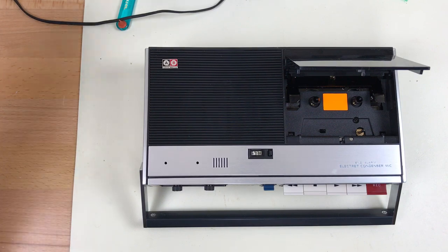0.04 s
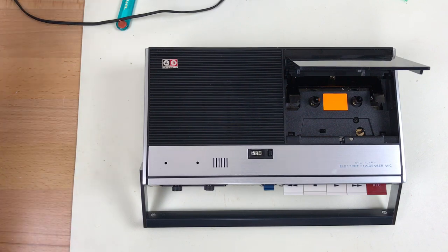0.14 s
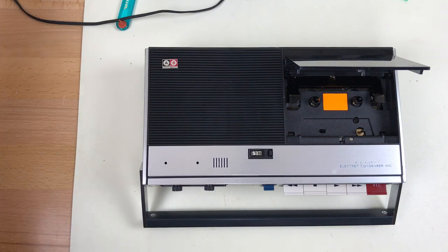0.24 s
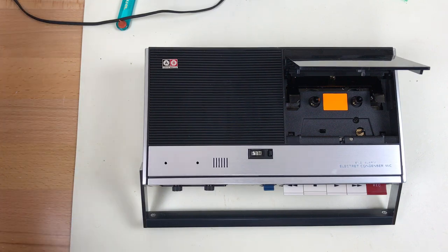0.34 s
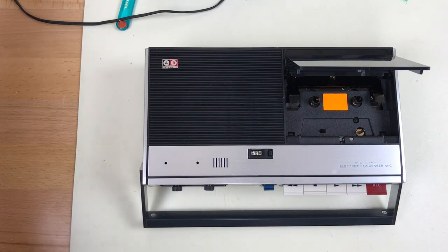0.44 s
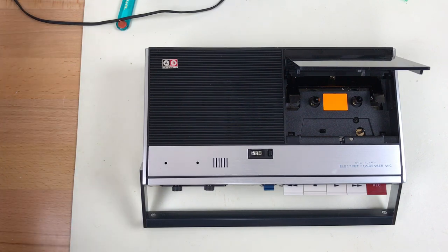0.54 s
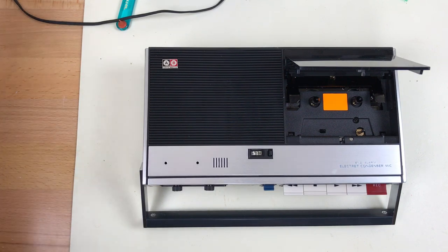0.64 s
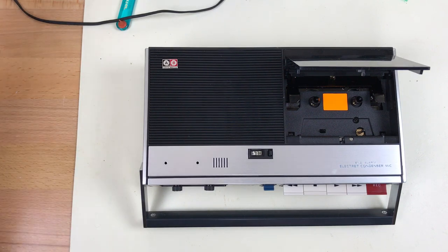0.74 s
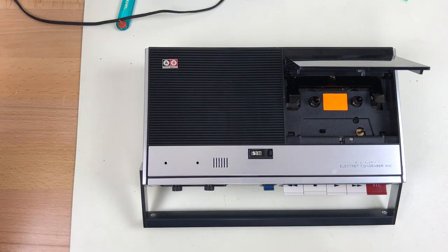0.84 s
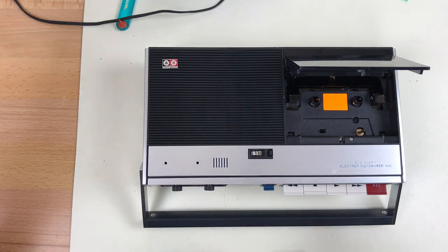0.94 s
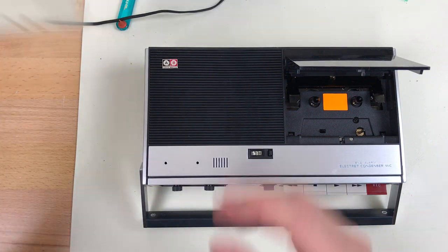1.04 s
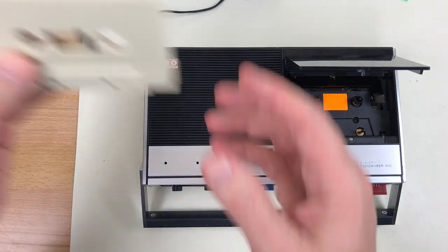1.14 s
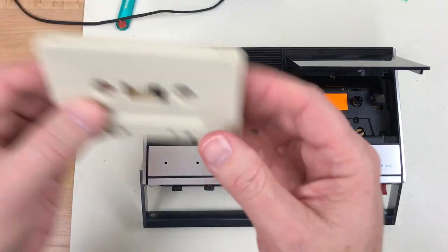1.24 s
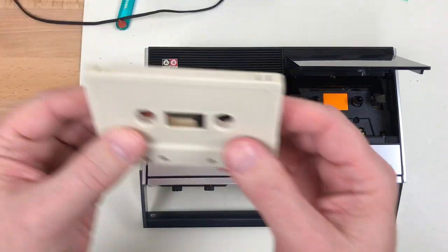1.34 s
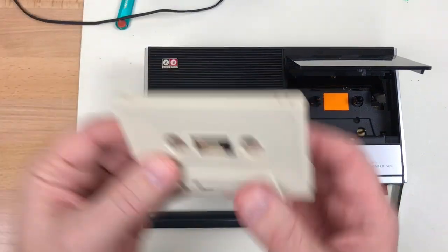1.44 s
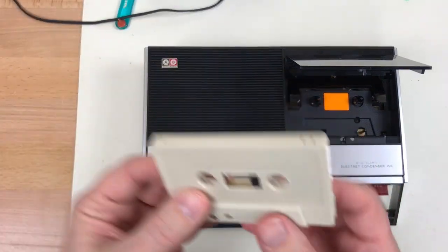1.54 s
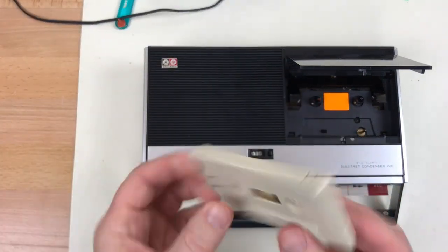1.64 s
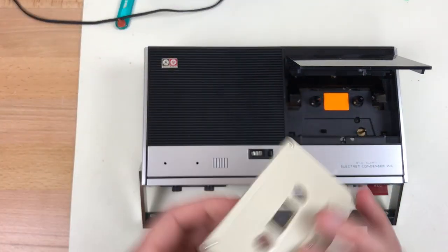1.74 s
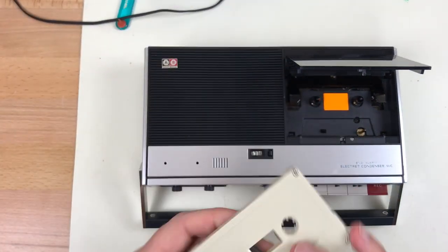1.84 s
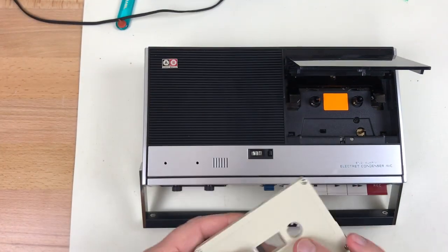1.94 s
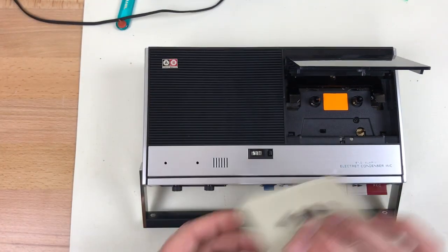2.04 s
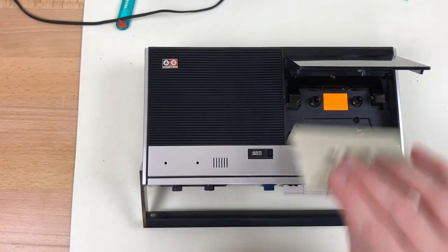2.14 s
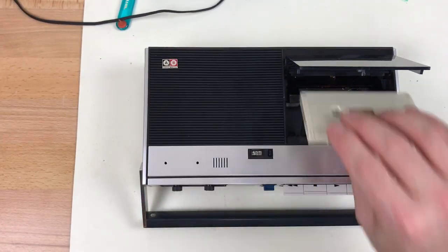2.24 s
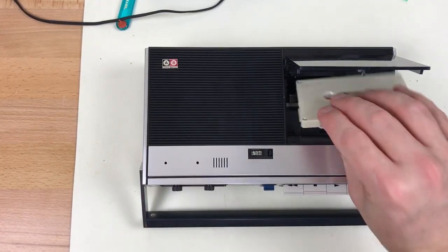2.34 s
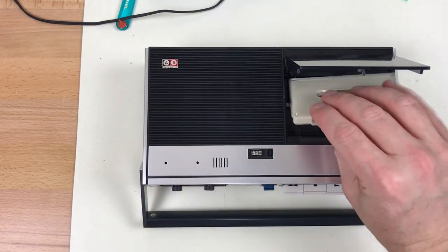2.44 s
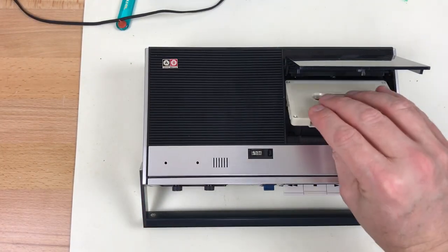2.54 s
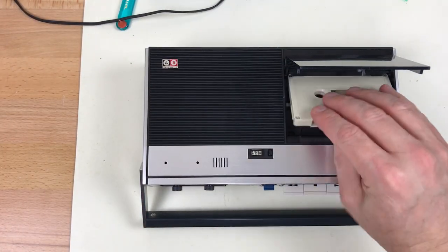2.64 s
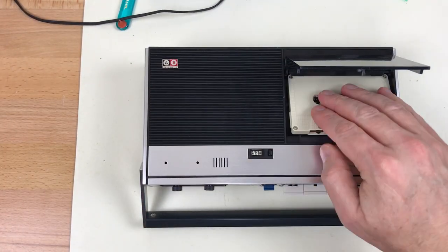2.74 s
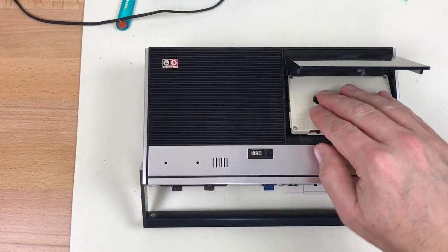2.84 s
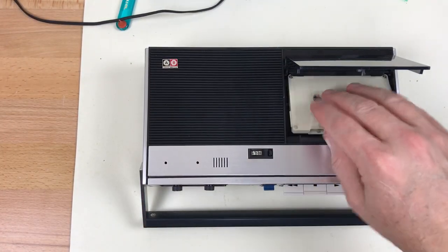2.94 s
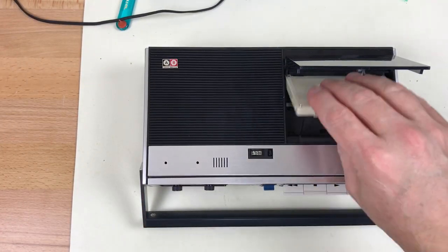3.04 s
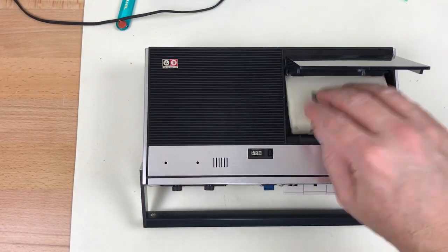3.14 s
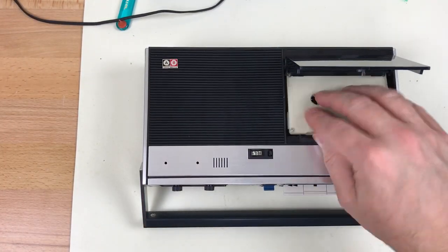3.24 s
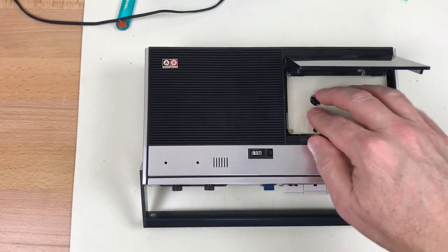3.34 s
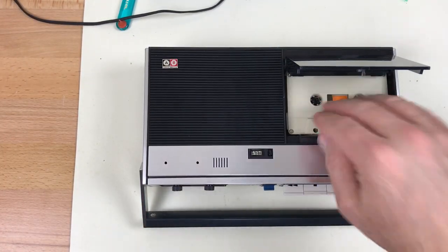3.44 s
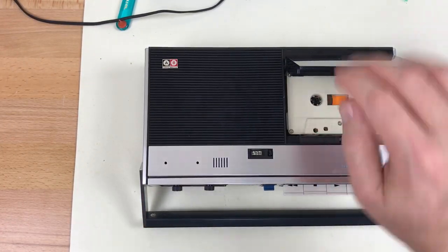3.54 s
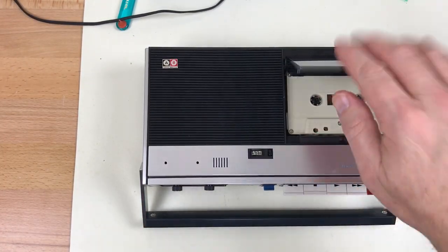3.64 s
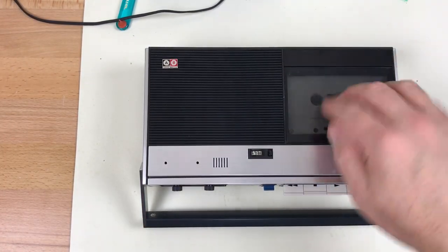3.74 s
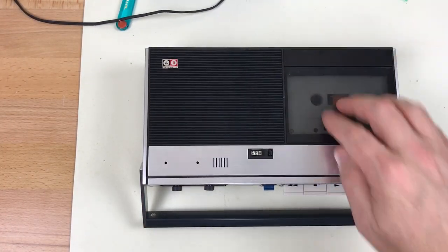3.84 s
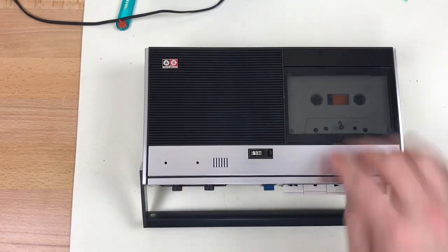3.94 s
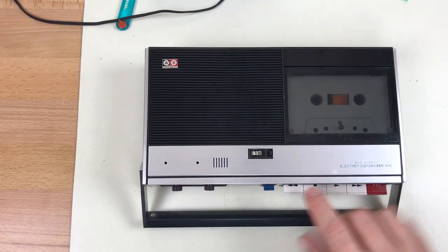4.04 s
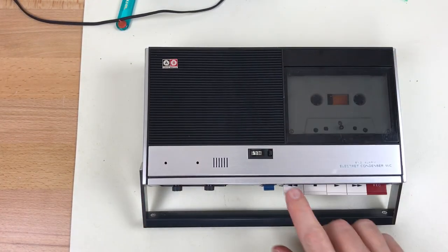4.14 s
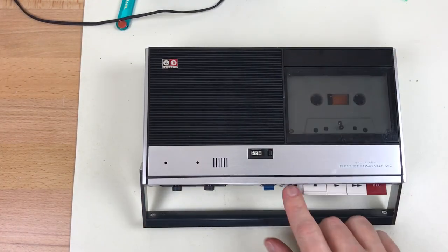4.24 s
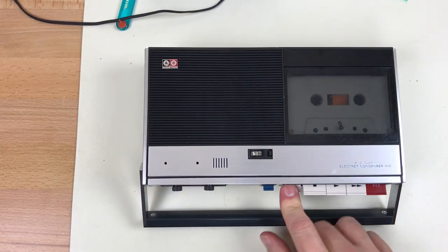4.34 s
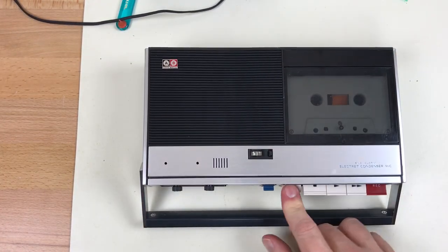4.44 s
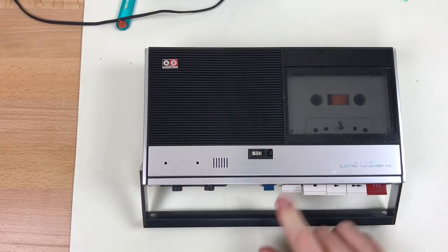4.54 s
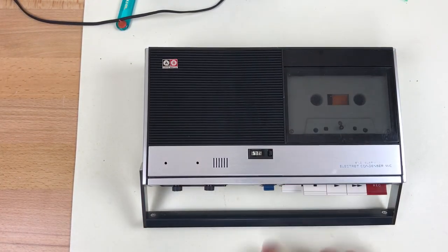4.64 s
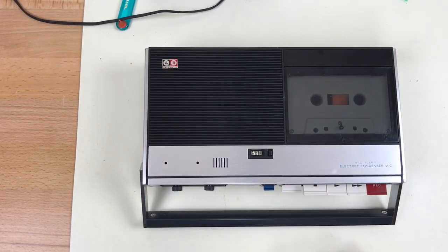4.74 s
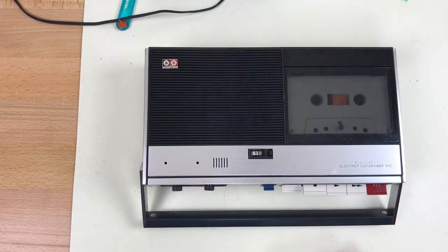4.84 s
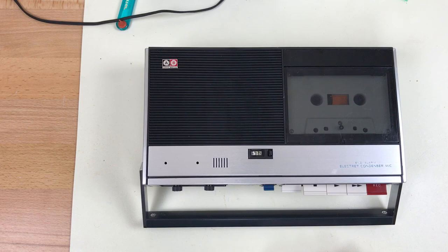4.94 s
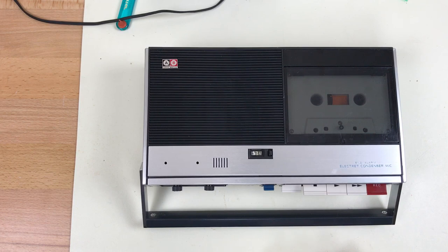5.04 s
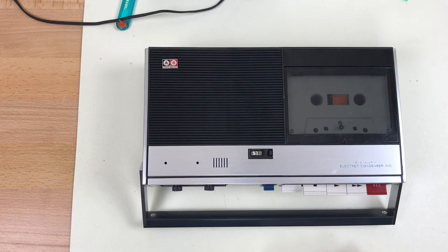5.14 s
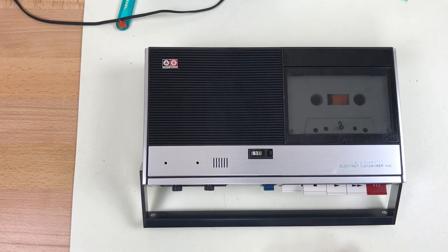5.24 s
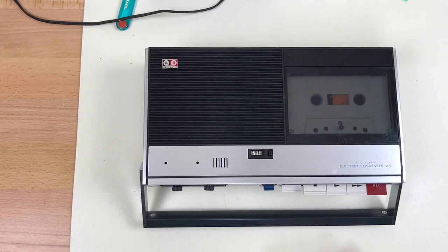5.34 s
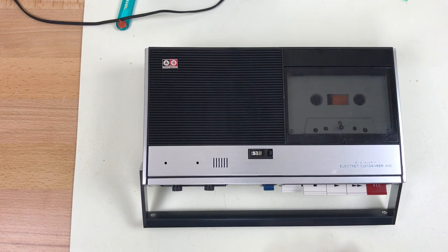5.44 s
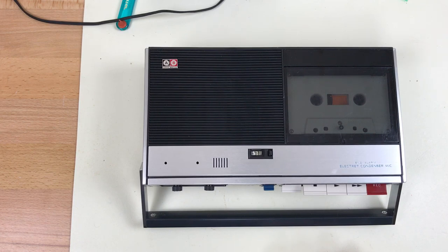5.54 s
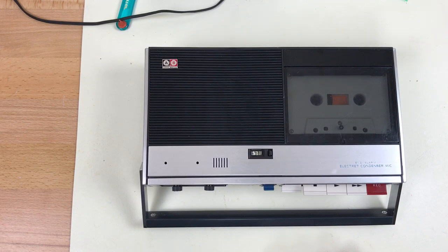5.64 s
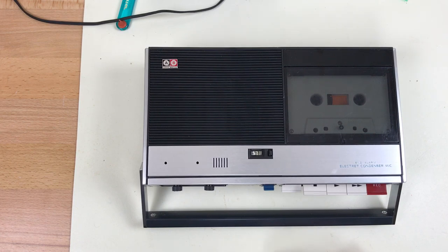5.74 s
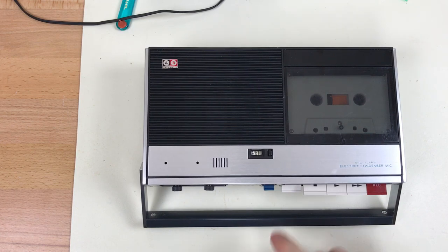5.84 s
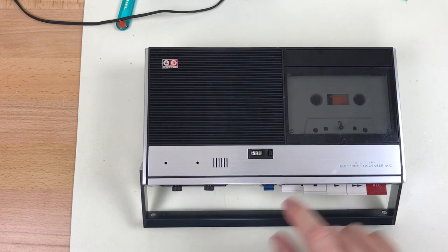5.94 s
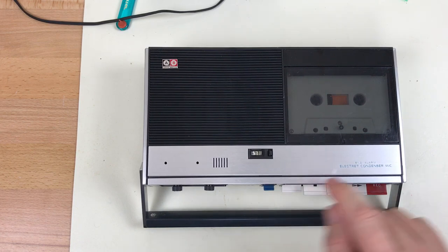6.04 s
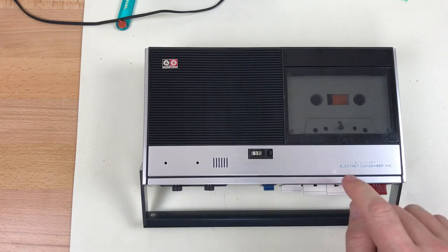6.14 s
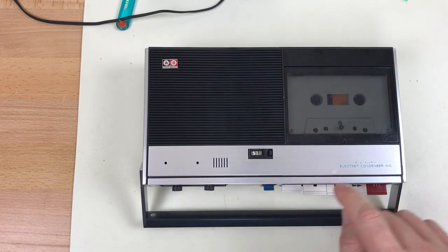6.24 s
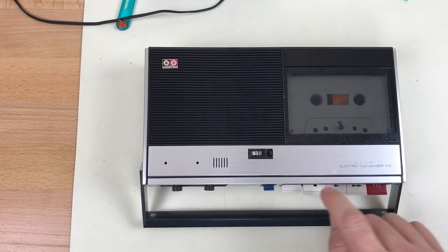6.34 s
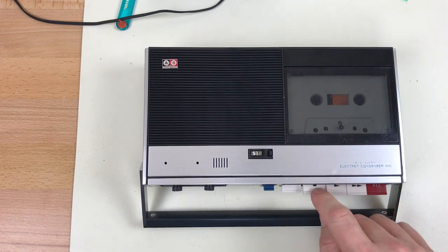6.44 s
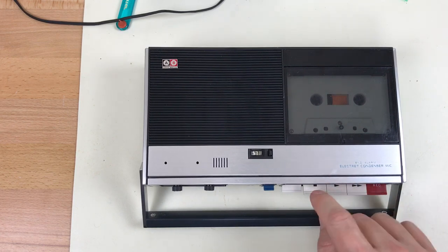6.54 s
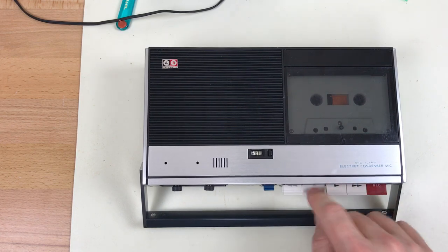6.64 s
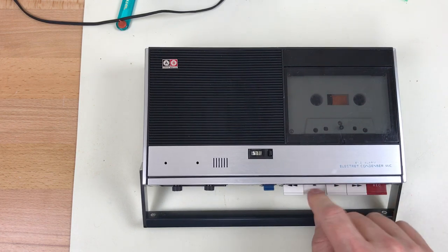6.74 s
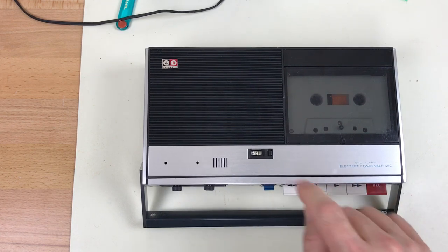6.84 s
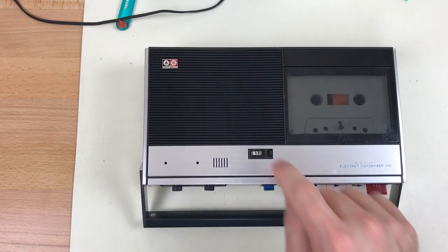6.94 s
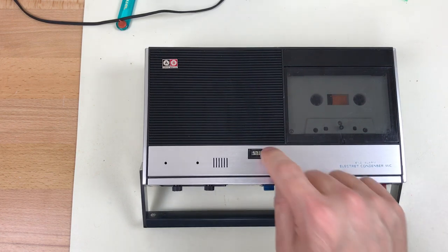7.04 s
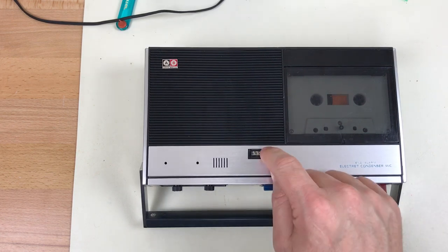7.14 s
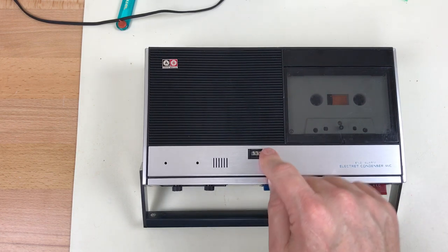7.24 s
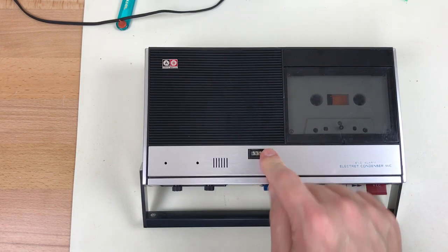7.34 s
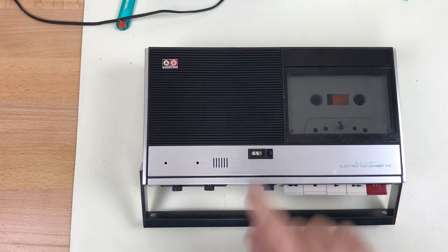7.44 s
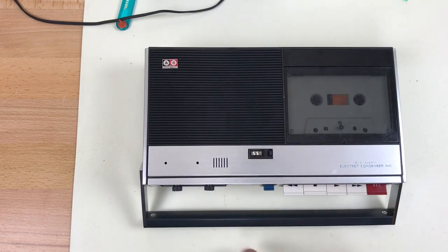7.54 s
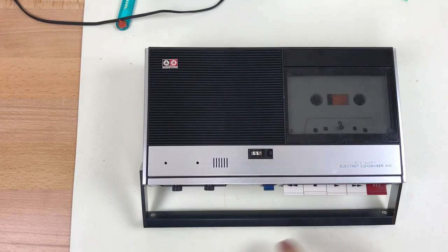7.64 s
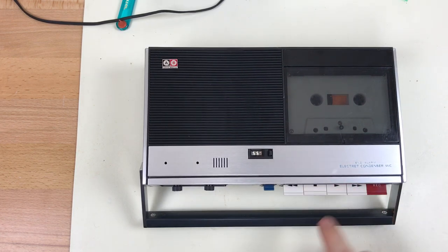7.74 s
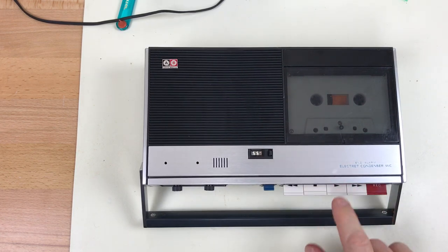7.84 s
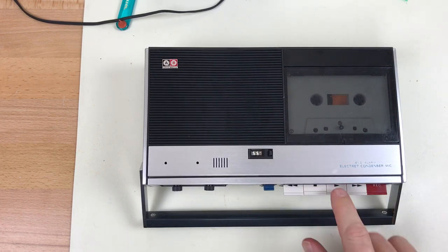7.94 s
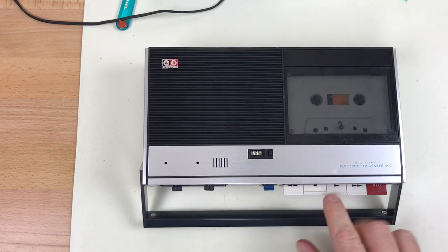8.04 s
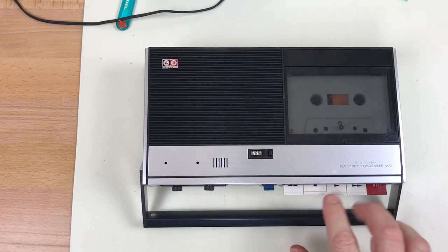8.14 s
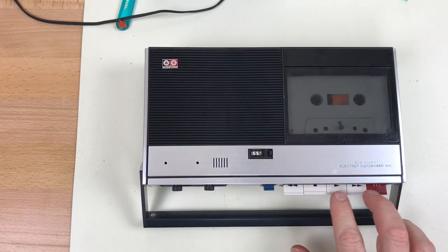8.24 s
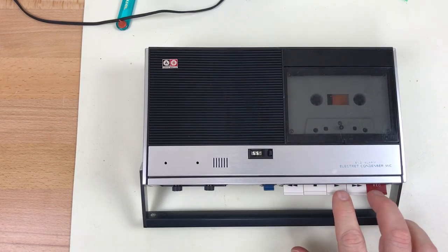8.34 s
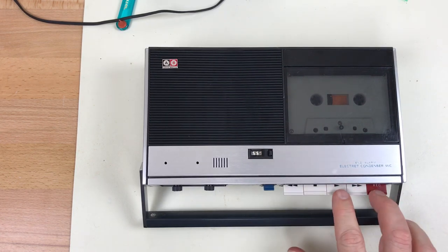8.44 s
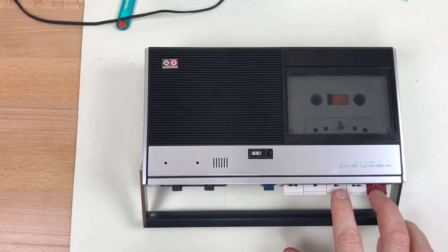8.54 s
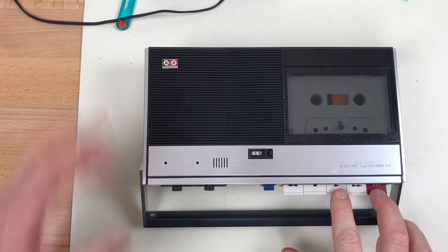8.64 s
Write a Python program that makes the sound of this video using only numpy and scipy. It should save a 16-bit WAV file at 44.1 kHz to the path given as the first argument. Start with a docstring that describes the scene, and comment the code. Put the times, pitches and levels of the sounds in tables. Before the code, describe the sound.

A plastic cassette box knocks open, a cassette rattles and clunks into a tape deck, the lid snaps shut, and keys clack in a quiet room.

```python
"""A desk in a quiet room, heard close: a portable tape deck stands on it and a cassette box opens off to the side.
The cassette rattles in the hands, slides and knocks into the well, the lid shuts, keys clack, the tape winds a second.
Knocks are chattering noise bursts through resonances of hollow case, thin shells and small parts, with room tails.
Slides and whirring spools are uneven noise through resonances; desk booms, springs and pings are decaying tones.
Beneath lie steady hiss, lumpy low rumble and two faint electronic tones."""
import sys
import numpy as np
from scipy import signal
from scipy.fft import rfft, irfft, next_fast_len
from scipy.io import wavfile
from scipy.ndimage import map_coordinates

SR = 44100
rng = np.random.default_rng(int(sys.argv[2]) if len(sys.argv) > 2 else 0)


def pcm_store(signal):
    """Save signal as 16-bit PCM."""
    levels = np.round(np.clip(np.atleast_2d(signal), -1, 1) * 32767)
    wavfile.write(sys.argv[1], SR, levels.astype(np.int16).T)


N = 382788

# background hiss and distant low unrest, colour only: (frequency [Hz], relative density [dB])
HISS_COLOUR = [(12, -28.5), (20, -0.5), (53, 1), (182, -8), (234, -6), (310, -7.5), (825, -13.5),
               (949, -15), (5380, -20), (6180, -19.5), (10800, -21.5), (12100, -20.5), (16000, -25.5)]
RUMBLE_COLOUR = [(20, 0), (60, -5.5), (120, -11), (300, -22.5), (500, -53.5)]
HISS_DB, HISS_TOP_HZ = -67.5, 15800
# faint electronic tones: (frequency [Hz], mean peak level [dB])
TONES = [(6010, -89.5), (12023, -86)]

# how fast the room dies away: (frequency [Hz], t60 [s])
ROOM_DECAY = [(150, 0.33), (600, 0.29), (2000, 0.26), (6000, 0.26), (15000, 0.22)]
# soft furnishings colour the room tail and swallow treble: (frequency [Hz], level [dB])
FURNISHINGS = [(300, -2.5), (2000, 2), (6000, -1), (10000, -1.5), (15000, -4)]
ECHOES = 16  # different room tails, taken in turn

# resonances of the hollow case, thin shells, small parts with edges, and running spools:
# (frequency [Hz], width [Hz], relative level [dB])
CASE_MODES = [(309, 66, -10.5), (366, 100, -11.5), (549, 150, -0.5), (649.5, 83, 0), (709, 62, 1),
              (844, 120, -2.5), (924, 99, -1.5)]
SHELL_MODES = [(1127, 130, -6.5), (1410, 82, 1.5), (1509, 260, 0), (1627, 150, 0.5), (1818, 160, -5.5),
               (2004, 380, -4.5), (2697, 490, -6.5), (2940, 1600, -9.5)]
SNAP_MODES = [(3573, 810, -1), (4423, 390, -2), (5225, 480, -0.5), (5900, 700, 0), (7740, 1700, 0),
              (9450, 3000, -4.5), (12900, 920, -5), (15200, 2000, -8.5)]
SPOOL_MODES = [(611.6, 63, 0.5), (899, 410, -9), (1450, 220, -6), (2100, 690, -16), (4520, 250, -10.5),
               (5640, 820, -15.5), (6950, 610, -16.5)]
# mode levels scatter from blow to blow; the room hears the modes this many times wider
SCATTER_DB, ROOM_BLUR = 3.5, 1.8

# spools running: (time [s], level [dB])
WINDING_LEVEL = [(4.42, -59), (4.5, -72.5), (4.737, -67.5), (4.928, -69), (5.38, -70), (5.46, -64)]

# a tiny loose metal part in the cassette: (frequency [Hz], t60 [s])
METAL_PART = (12070, .16)
# when it rings: (time [s], level [dB])
METAL_RINGS = [(1.8507, -47), (2.5258, -54), (2.69, -58), (3.22, -53), (3.3424, -56.5)]
# a thin ring, as of a steel spring: (frequency [Hz], relative level [dB], t60 [s])
SPRING_TONES = [(555, -26.5, 1.4), (690, 7.5, 0.18)]
# keys that set the spring off: (time [s], level [dB])
SPRING_PLUCKS = [(6.47, -57), (6.567, -61.5), (6.72, -36.5), (6.83, -53), (7.135, -61)]

# plastic sliding on plastic:
# (start [s], end [s], shell level [dB], case re shell [dB], snap re shell [dB])
SLIDE_MOVES = [(.348, .43, -45.5, -9, -22), (.435, .6, -59, 2, -16), (.72, .8, -68, -9, -27),
               (.98, 1.05, -69, 0, -14), (1.47, 1.56, -70, -4, 0), (1.72, 1.79, -70, -11, -9),
               (1.83, 1.93, -59, -10, -9), (1.998, 2.1, -65, -20, -4), (2.378, 2.43, -63.5, 11, -8),
               (2.493, 2.54, -49.5, 7.5, -20), (2.55, 2.62, -53, -1, -11), (2.621, 2.7, -45.5, -6, -7.5),
               (2.732, 2.775, -32.5, -20, -8.5), (2.97, 3.01, -62.5, -1, -13.5),
               (3.015, 3.09, -44.5, -3.5, -7), (3.202, 3.24, -40, -3, -4), (3.289, 3.34, -45, -1.5, -3),
               (3.715, 3.79, -65, 9, -4.5), (4.339, 4.39, -48, 3, -3), (5.447, 5.505, -55.5, -3, -15),
               (6.73, 6.8, -64, -3, -3.5)]

# the desk top, and the desk shuddering on its legs: (frequency [Hz], t60 [s])
DESK_TOP = (138, .25)
DESK_SHUDDER = (46, 0.16)
# blows that reach the desk: (time [s], desk top level [dB], shudder level [dB])
DESK_BLOWS = [(.365, -63, -70), (0.4283, -40, -55), (2.4317, -57, -47), (2.5737, -59, -48),
              (2.6683, -50, -50), (2.7555, -50.5, -41), (2.812, -63, -43), (3.03, -51, -56),
              (3.2334, -42.5, -41), (3.331, -50, -40), (3.7182, -47, -39), (3.802, -38.5, -39),
              (4.3327, -55, -55), (4.3944, -51.5, -49), (4.614, -62, -70), (5.459, -56.5, -65.5),
              (6.4696, -68, -46), (6.6803, -57, -49), (6.719, -45, -40), (6.8247, -52.5, -50),
              (7.134, -53.5, -53), (7.641, -60.5, -52)]

# contacts of the box, the cassette in the hands, the cassette in the well, the lid, and keys, latches and counter:
# (time [s], shell peak [dB], case re shell [dB], snap re shell [dB],
#  favoured shell pitch [Hz], favoured snap pitch [Hz], chatter t60 [s])
BOX_KNOCKS = [(.3469, -36.5, 3.5, -12, 1320, 3590, 0.027), (.3554, -41, -19, 4, 1010, 3600, 0.036),
              (.3656, -32.5, 7, 0, 1070, 3500, 0.014), (.4303, -33, 5, -1, 1290, 5100, 0.046),
              (.4414, -34.5, 2, -33, 1660, 3240, .025), (.5101, -41.5, 5, -15, 1150, 3370, 0.026),
              (.5846, -57.5, 5, 5, 1020, 4500, 0.036), (.7151, -32.5, -15, -15, 1520, 3550, 0.011),
              (.727, -40.5, -33, -12, 1580, 3200, 0.0086), (.7358, -38.5, -11, -15, 1620, 4070, 0.01),
              (.8084, -61.5, -17, 12, 1530, 6300, 0.054), (.8647, -65.5, -8, 12.5, 2490, 3490, .026)]
HAND_RATTLES = [(1.0009, -46.5, -13, -21, 1570, 3680, 0.041), (1.1189, -45.5, -10, 1.5, 2020, 3870, 0.0088),
                (1.3196, -45.5, -3, -7, 1420, 4770, 0.035), (1.3477, -33.5, -10.5, -4.5, 1600, 5230, 0.01),
                (1.51, -47, -15, -13, 1350, 7590, 0.017), (1.5405, -54, -6, -12, 1360, 10100, 0.014),
                (1.7539, -53, -17, -18, 1370, 3310, 0.018), (1.8259, -23.5, -15, -11.5, 1460, 5000, 0.023),
                (1.8414, -33, -18, -5, 1360, 6120, 0.03), (1.8507, -38, -30, 2.5, 1450, 9000, 0.036),
                (1.8779, -30.5, -13.5, -10, 1590, 5400, 0.015), (1.8928, -32, -29, -16, 1470, 5780, 0.014),
                (1.9033, -28.5, -20, -23, 2010, 4500, 0.011), (2.027, -47, -22, -7, 1370, 4440, 0.026),
                (2.0592, -53.5, -25, -3, 2210, 4490, 0.039), (2.1037, -64.5, -11, 17.5, 1600, 7930, 0.024),
                (2.1525, -46.5, -6, -16, 1950, 5260, 0.024), (2.1606, -42, -14, -13, 2240, 3360, 0.094)]
WELL_KNOCKS = [(2.3771, -54.5, 18, 5.5, 1110, 5510, 0.014), (2.3917, -56, 4, 2, 1490, 6410, .02),
               (2.4042, -61, 19, -1, 1320, 5770, 0.02), (2.4301, -26, 3.5, -3, 2450, 5400, .02),
               (2.4413, -42.5, 10, -22, 2400, 3280, 0.015), (2.4932, -38.5, 5.5, -17, 1450, 5780, 0.015),
               (2.5076, -29, -4, -17, 1490, 5770, 0.012), (2.5258, -37.5, -10, -7, 2120, 10000, 0.022),
               (2.5401, -20, -10.5, -6.5, 2120, 6650, 0.042), (2.5737, -43, -20, -14, 1350, 4530, 0.025),
               (2.6202, -46, -1.5, -21, 1530, 3270, .026), (2.642, -42.5, -11, 8, 2170, 5500, 0.021),
               (2.6532, -35, 1.5, -20, 1350, 3290, 0.03), (2.6678, -27.5, 1.5, -2.5, 1170, 3380, 0.032),
               (2.7304, -38, -24, -18, 1480, 6040, .023), (2.7422, -31.5, -1.5, -6, 1470, 3360, 0.059),
               (2.7555, -26.5, -4, 3, 1400, 5770, 0.017), (2.8102, -52, -2, -9, 1820, 6340, .028),
               (2.967, -56, 4, -3, 1620, 5400, 0.031), (2.985, -57, 14, -5.5, 1670, 4660, 0.064),
               (3.017, -28, -9, -2, 1630, 3380, 0.059), (3.0294, -30, -9.5, -11, 1630, 4640, 0.065),
               (3.0658, -36, -1.5, -0.5, 1630, 7050, 0.058), (3.125, -38, -29, -18, 1630, 3260, .015),
               (3.2018, -41.5, 0, -3, 1500, 7390, .026), (3.2113, -24, -7, -15, 2050, 5990, 0.017),
               (3.2191, -31, -0.5, -14, 1500, 6900, 0.012), (3.2262, -23.5, -4.5, -3, 1640, 7000, 0.024),
               (3.2321, -17, -9.5, -7, 1640, 6620, 0.032), (3.2476, -31.5, -18.5, -12, 1640, 3420, .021),
               (3.2968, -29.5, -14, -15, 1540, 4224, 0.02), (3.3123, -22.5, -24, -8.5, 1630, 4700, .022),
               (3.3204, -33, 3, 5.5, 1560, 4435, .016), (3.3315, -16.5, -2.5, 0, 990, 7460, 0.019),
               (3.3424, -23.5, -6, -20, 1020, 9000, .025), (3.463, -48.5, 8, -16, 1010, 6000, .02)]
LID_KNOCKS = [(3.7172, -49, 11, -4.5, 1360, 5640, 0.015), (3.7929, -23, 2.3, -2, 1080, 9000, 0.027),
              (3.8001, -12.5, 1.7, -1, 1360, 6150, 0.021), (3.8061, -20, 1.2, -11, 1840, 6220, 0.029)]
KEY_KNOCKS = [(4.3161, -45.5, 4.5, -1, 2230, 7970, 0.019), (4.3331, -52, 17, -19.5, 1030, 3270, 0.012),
              (4.3925, -28.5, -1, 2, 1986, 6300, 0.025), (5.459, -44.5, -0.5, -4, 1640, 4510, 0.028),
              (5.4814, -52, 2, -13, 1580, 3300, .028), (6.4696, -38, -3, 6.5, 1494, 8300, 0.015),
              (6.567, -47, -5, -14, 1490, 3600, 0.013), (6.6803, -38.5, -5, 4, 1530, 8130, .016),
              (6.7065, -45.5, 6, -9.5, 1100, 4000, .015), (6.7131, -26.5, -1, -4, 1460, 5050, 0.029),
              (6.7176, -15.5, -3, -3, 1010, 6000, 0.032), (6.7305, -27, 0, 1.5, 1010, 6320, 0.0083),
              (6.7524, -35, 2.5, -16.5, 1040, 5970, .026), (6.8245, -43.5, -6, 5.5, 1350, 6680, 0.007),
              (6.8329, -37, -1, 2.5, 1970, 6060, 0.011), (7.1336, -49, 2.5, 3, 1065, 4330, 0.065),
              (7.4561, -40, -1.5, 5, 1400, 5930, 0.014), (7.641, -58, -9.5, 2, 1200, 4290, 0.014),
              (7.7817, -57.5, -1.5, -11, 1080, 8970, 0.022)]
# a loose spool ticks while winding: (time [s], shell peak [dB])
SPOOL_TICKS = [(4.519, -57.5), (4.6141, -51), (4.8055, -51), (4.8842, -60.5), (4.9493, -52), (5.016, -53),
               (5.0896, -53), (5.2977, -56)]
# shared by those ticks: (case re shell [dB], snap re shell [dB],
#  favoured shell pitch [Hz], favoured snap pitch [Hz], chatter t60 [s])
TICK_SOUND = (-2, -14, 1420, 4600, .022)
# shared by each kind of contact: (favoured case pitch [Hz], hard-edge lift [dB], room level [dB])
BOX_KIND = (1060, -7, -4)
HAND_KIND = (680, -6, -10.5)
WELL_KIND = (910, -1, -9.5)
LID_KIND = (420, 1.6, -11)
KEY_KIND = (840, 0, -10)
TICK_KIND = (640, -4, -7)
# snap over chatter length; brighter snaps have harder edges
SNAP_SHORTER, LIFT_DB_PER_OCTAVE, MID_SNAP_HZ = 0.75, 3, 6000


def amp(db):
    """dB to gain."""
    return 10 ** (np.asarray(db) / 20)


def unit(x):
    """Scaled to rms 1."""
    return x / np.sqrt(np.mean(x ** 2) + 1e-20)


def along(points, hz):
    """Reads a curve of (Hz, value) points on a log frequency axis."""
    f, value = np.transpose(points)
    return np.interp(np.log(hz + 1), np.log(f + 1), value)


def wobble(rate):
    """A smooth random curve, rate knots a second."""
    knots = rng.standard_normal(int(N * rate / SR) + 4)
    return map_coordinates(knots, [np.arange(N) * rate / SR])


def filtered(x, response):
    """Multiplies the spectrum of x by a response of frequency."""
    m = next_fast_len(len(x) + 2048)
    return irfft(rfft(x, m) * response(np.fft.rfftfreq(m, 1 / SR)), m)[:len(x)]


def fading(hz, t60, attack, n):
    """A decaying tone with a soft start."""
    t = np.arange(n) / SR
    return amp(-60 * t / t60) * np.sin(2 * np.pi * hz * t) * (1 - np.exp(-t / attack))


def body(modes, extra_db=0):
    """The causal response of damped resonances, alternating in polarity."""
    extra_db = np.broadcast_to(extra_db, len(modes))

    def response(f):
        total = 0
        for k, (centre, width, db) in enumerate(modes):
            damping = 1j * f * abs(width)
            total = total + (-1) ** k * amp(db + extra_db[k]) * damping / (centre * centre - f * f + damping)
        return total

    return response


def struck(modes, blow, favoured_hz, reach, depth_db, top_db=0):
    """A blow through the modes, peak 1, and the equally strong impulse that feeds the room.
    The spot struck favours modes near one pitch; top_db sets the edge of the highest ones."""
    modes = np.array(modes)
    octaves_off = np.log2(modes[:, 0] / favoured_hz)
    spot_db = -depth_db * np.minimum((octaves_off / reach) ** 2, 1)
    spot_db = spot_db + top_db * (modes[:, 0] > 8500)
    ring = filtered(blow, body(modes, spot_db + rng.normal(0, SCATTER_DB, len(modes))))
    # the room gets wider modes without scatter, as a mean over all directions
    even = filtered(signal.unit_impulse(len(blow)), body(modes * [1, ROOM_BLUR, 1], spot_db))
    ring = ring / np.abs(ring).max()
    return np.array([ring, even * np.linalg.norm(ring) / np.linalg.norm(even)])


def room_tails():
    """A set of diffuse noise tails; each frequency dies at its own speed."""
    noise = rng.standard_normal((ECHOES, SR // 3))
    hz, t, z = signal.stft(noise, SR, nperseg=256)
    fall_db = along(FURNISHINGS, hz)[:, None] - 60 * t / along(ROOM_DECAY, hz)[:, None]
    tails = signal.istft(z * amp(fall_db), SR, nperseg=256)[1]
    return tails / np.linalg.norm(tails, axis=1, keepdims=True)


def room(x, tail):
    """The walls answer a moment later."""
    return signal.fftconvolve(np.pad(x, (180, 0)), tail)  # 180 samples: 4 ms


def hush():
    """Steady hiss, a lumpy low rumble and two faint tones."""
    hiss = unit(filtered(rng.standard_normal(N), lambda hz: amp(along(HISS_COLOUR, hz)) * (hz < HISS_TOP_HZ)))
    rumble = unit(filtered(rng.standard_normal(N), lambda hz: amp(along(RUMBLE_COLOUR, hz))))
    t = np.arange(N) / SR
    tones = sum(amp(db + 1.5 * wobble(22)) * np.sin(2 * np.pi * hz * t) for hz, db in TONES)
    rumble_db = -76.5 + 6.7 * wobble(7.1)
    return amp(HISS_DB) * hiss + amp(rumble_db) * rumble + tones


def winding():
    """The spools whirr unevenly in the well: noise in short random steps drives their resonances."""
    s, db = np.transpose(WINDING_LEVEL)
    level_db = np.interp(np.arange(N) / SR, s, db, left=-150, right=-150)
    rattle = np.repeat(rng.exponential(size=N // 200 + 1), 200)[:N]
    whirr = unit(filtered(rng.standard_normal(N) * amp(1.3 * rattle), body(SPOOL_MODES)))
    return amp(level_db + 1.85 * wobble(31)) * whirr


def pings():
    """A loose metal part rings high and thin, a decaying tone blurred by quick flutter."""
    out = np.zeros(N + SR)
    for s, db in METAL_RINGS:
        out[round(s * SR):][:SR // 4] += amp(db) * fading(*METAL_PART, 0.0015, SR // 4)
    return out[:N] * unit(wobble(350))


def springs():
    """Narrow decaying tones outlast the plastic when a key moves."""
    out = np.zeros(N + SR)
    ring = sum(amp(db) * fading(hz, t60, .003, SR // 2) for hz, db, t60 in SPRING_TONES)
    ring = ring * np.hanning(SR)[SR // 2:] ** 0.22  # taper to silence
    for s, db in SPRING_PLUCKS:
        out[round(s * SR):][:SR // 2] += amp(db) * ring
    return out[:N]


def slides():
    """Rubbing is a dense spray of tiny slips into the resonances that knocks ring."""
    out, tails = np.zeros(N + SR), room_tails()
    for k, (start, end, db, case_db, snap_db) in enumerate(SLIDE_MOVES):
        n = round((end - start) * SR)
        clumps = np.repeat(rng.exponential(size=n // 90 + 1), 90)[:n]  # 2 ms steps
        slips = rng.standard_normal(n) * amp(1.1 * rng.exponential(size=n) + 3.5 * clumps)
        parts = [(SHELL_MODES, 0), (CASE_MODES, case_db), (SNAP_MODES, snap_db)]
        rub = sum(amp(part_db) * unit(filtered(slips, body(modes))) for modes, part_db in parts)
        rub = rub * np.hanning(n) ** 0.62
        sound = amp(-10.5) * room(rub, tails[k % ECHOES])
        sound[:n] += rub
        out[round(start * SR):][:len(sound)] += amp(db) * sound
    return out[:N]


def desk():
    """The desk top booms and the whole desk shudders, each a low decaying tone."""
    out = np.zeros(N + SR)
    boom = fading(*DESK_TOP, .005, SR // 3)
    shudder = fading(*DESK_SHUDDER, 0.013, SR // 3)
    for s, boom_db, shudder_db in DESK_BLOWS:
        out[round(s * SR):][:SR // 3] += amp(boom_db) * boom + amp(shudder_db) * shudder
    return out[:N]


def contacts():
    """All knocks, each joined to what its kind shares."""
    ticks = [tuple(row) + tuple(TICK_SOUND) for row in SPOOL_TICKS]
    kinds = [(BOX_KNOCKS, BOX_KIND), (HAND_RATTLES, HAND_KIND), (WELL_KNOCKS, WELL_KIND),
             (LID_KNOCKS, LID_KIND), (KEY_KNOCKS, KEY_KIND), (ticks, TICK_KIND)]
    return [tuple(row) + tuple(kind) for rows, kind in kinds for row in rows]


def knocks():
    """Every knock is a short chatter of contacts that rings case, shell and edges."""
    out, t, tails = np.zeros(N + SR), np.arange(SR // 10) / SR, room_tails()
    for k, contact in enumerate(contacts()):
        s, db, case_db, snap_db, shell_hz, snap_hz, t60, case_hz, lift_db, room_db = contact
        chatter = rng.standard_normal(len(t)) * (1 - np.exp(-t / 0.0022))
        # the main contact is a short rounded push
        push = 0.99 * np.exp(-((t - .0013) / .00008) ** 2)
        blow = chatter * amp(-60 * t / max(t60, .004)) + push
        # small parts stop sooner than the large walls
        snap_blow = chatter * amp(-60 * t / max(SNAP_SHORTER * t60, .003))
        edge_db = lift_db + LIFT_DB_PER_OCTAVE * np.log2(snap_hz / MID_SNAP_HZ)

        shell = struck(SHELL_MODES, blow, shell_hz, reach=0.44, depth_db=7.5)
        case = struck(CASE_MODES, blow, case_hz, reach=0.72, depth_db=6.5)
        snap = struck(SNAP_MODES, snap_blow, snap_hz, reach=0.99, depth_db=6.5, top_db=edge_db)
        direct, into_room = shell - amp(case_db) * case + amp(snap_db) * snap

        sound = amp(room_db) * room(into_room, tails[k % ECHOES])
        sound[:len(t)] += direct
        out[round(s * SR):][:len(sound)] += amp(db) * sound
    return out[:N]


def scene():
    """Everything reaches one microphone."""
    background = hush() + winding()
    details = pings() + springs() + slides()
    return (background + details + desk() + knocks())[None]


def record(dry):
    """The top fades out over 500 Hz around a band limit of 16.5 kHz."""
    return filtered(dry[0], lambda hz: np.clip((16500 - hz) / 500 + .5, 0, 1))[None]


dry = scene()
out = record(dry)
pcm_store(out)
```